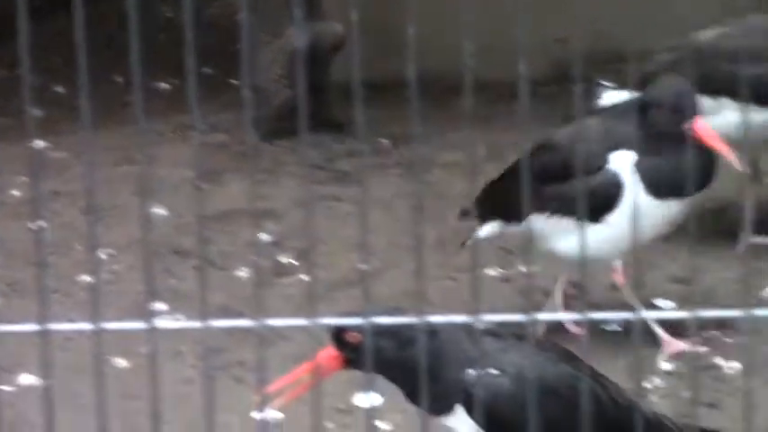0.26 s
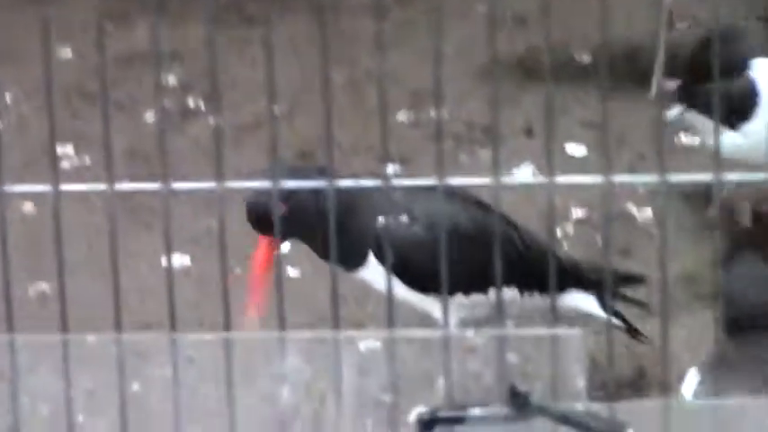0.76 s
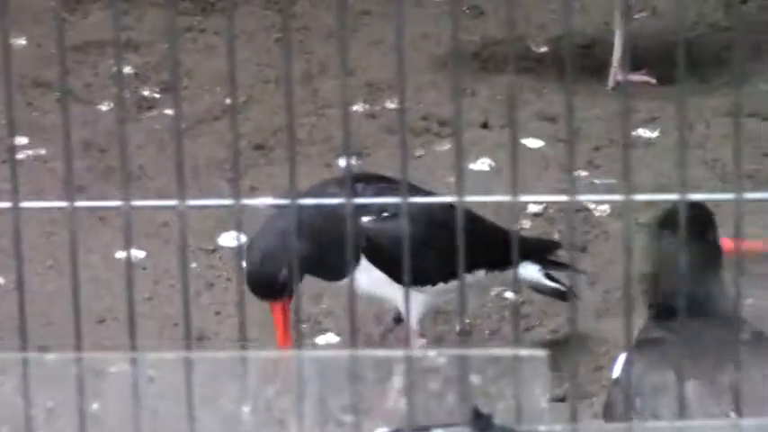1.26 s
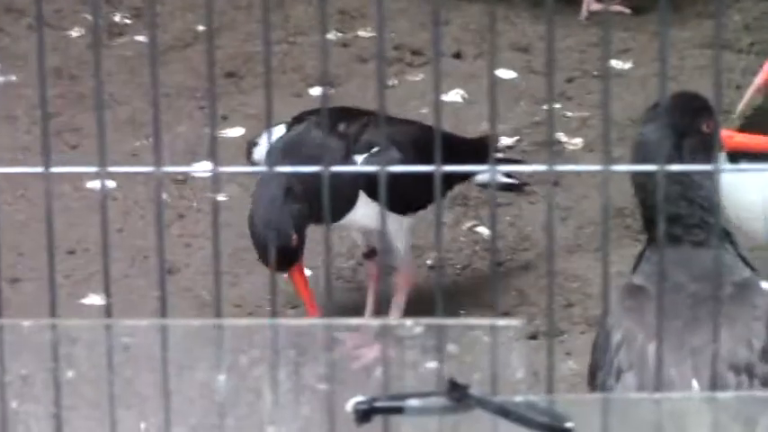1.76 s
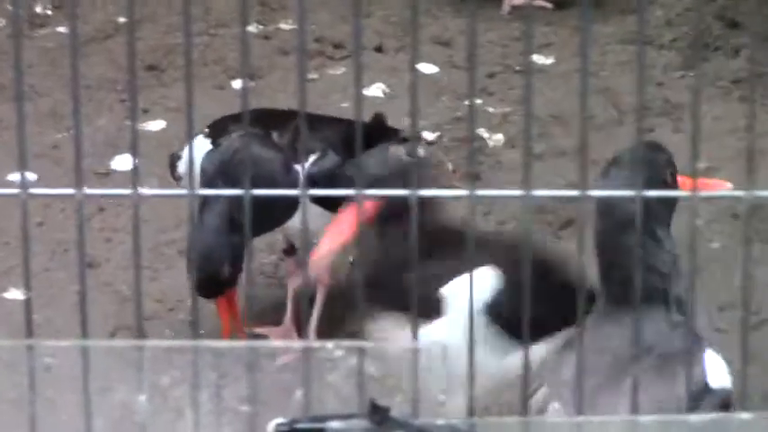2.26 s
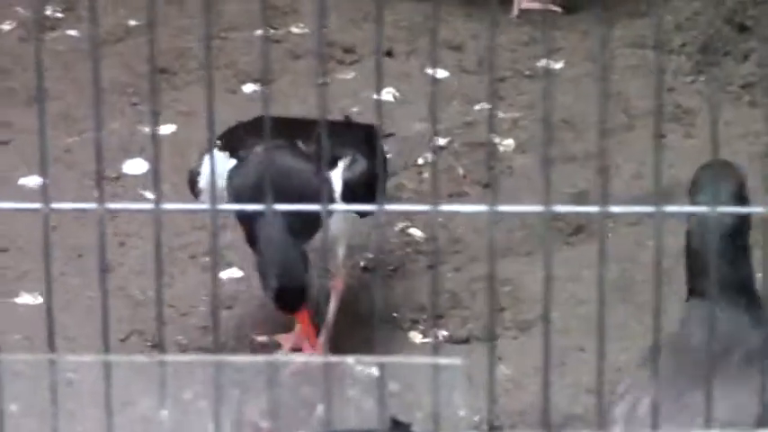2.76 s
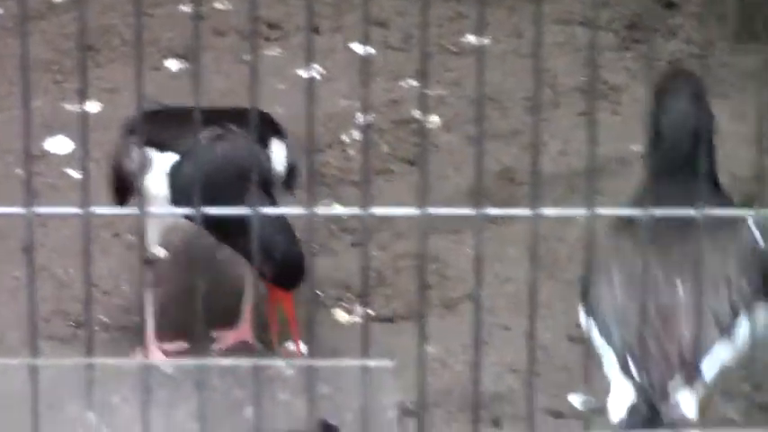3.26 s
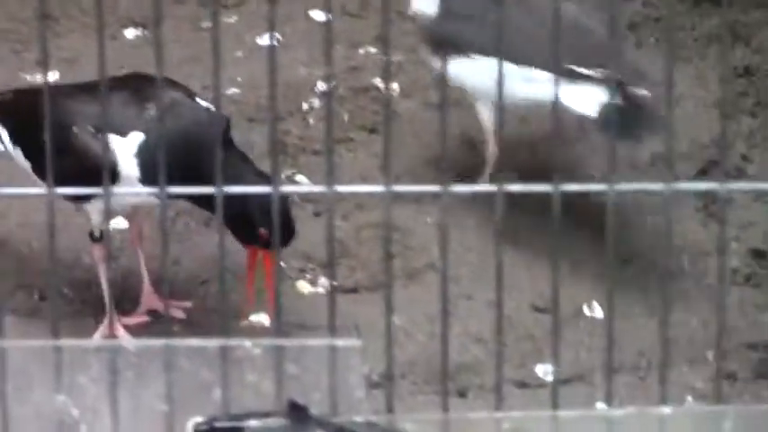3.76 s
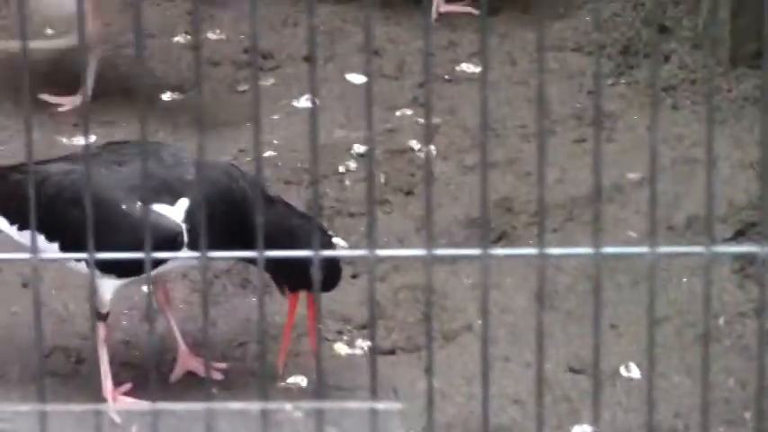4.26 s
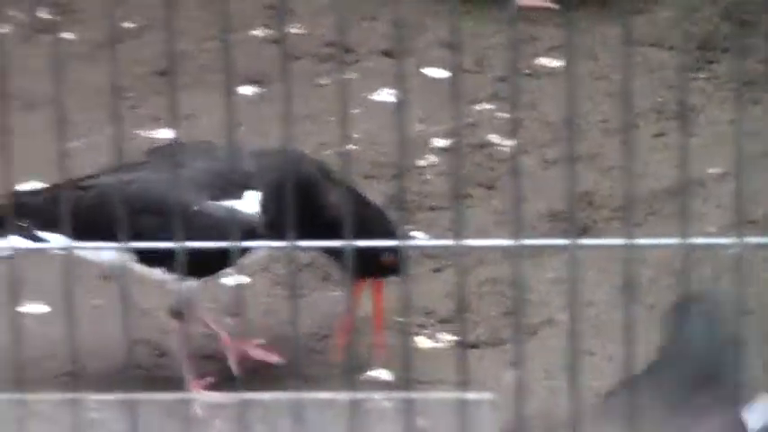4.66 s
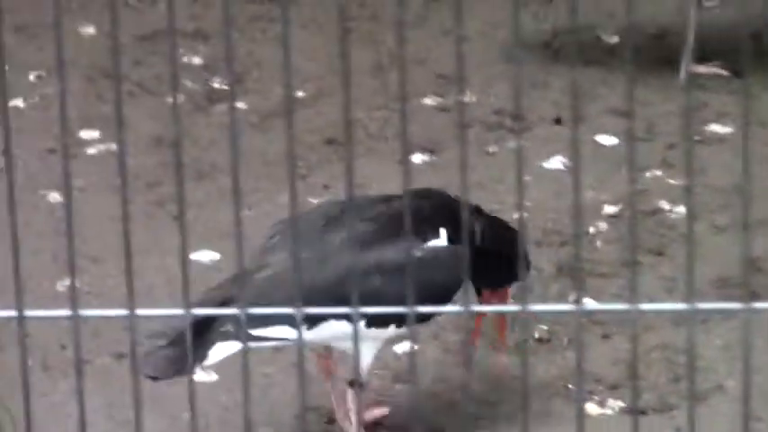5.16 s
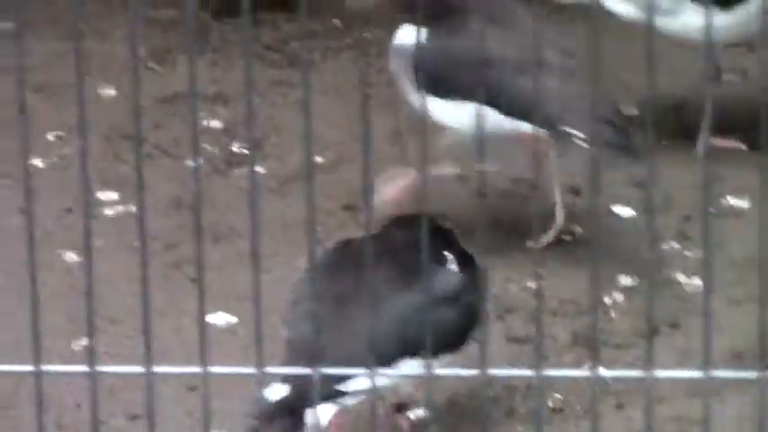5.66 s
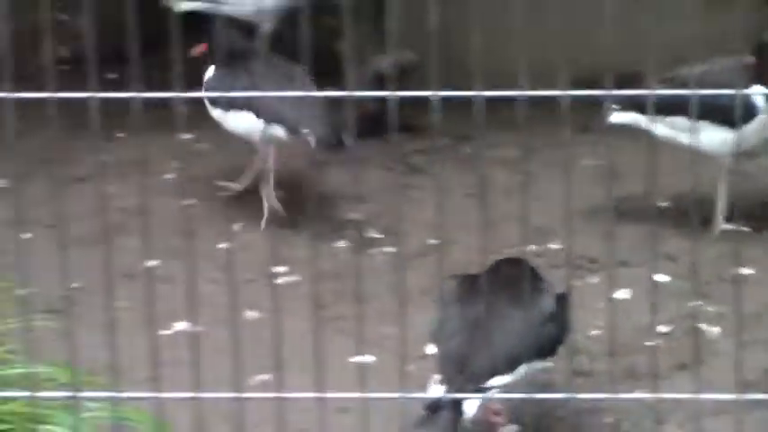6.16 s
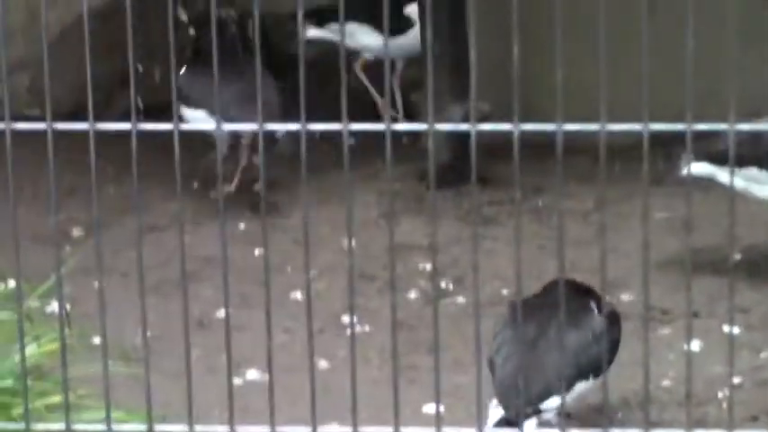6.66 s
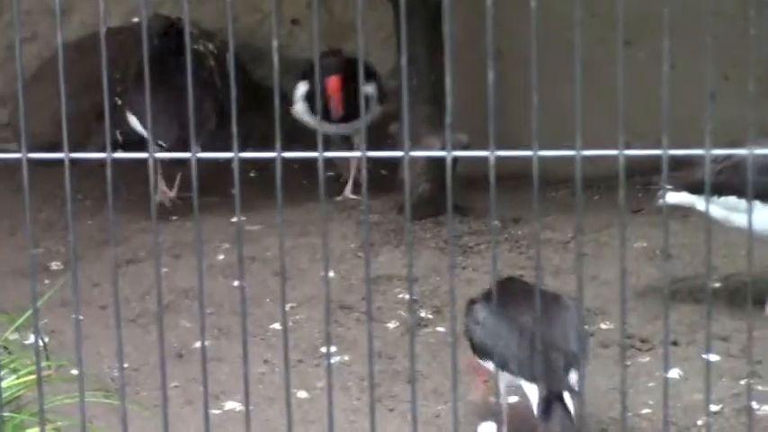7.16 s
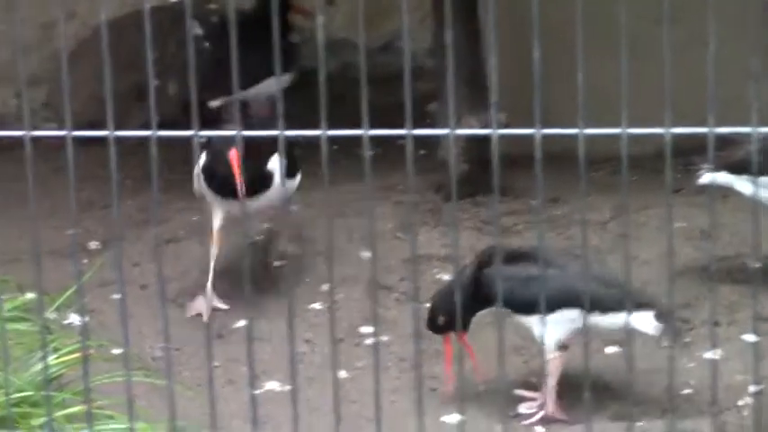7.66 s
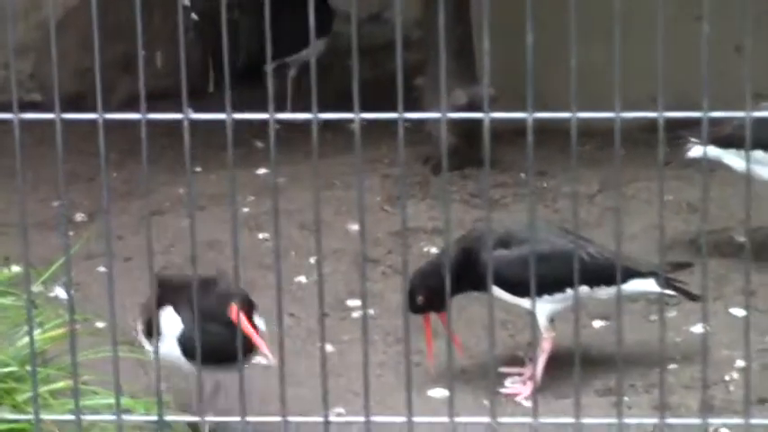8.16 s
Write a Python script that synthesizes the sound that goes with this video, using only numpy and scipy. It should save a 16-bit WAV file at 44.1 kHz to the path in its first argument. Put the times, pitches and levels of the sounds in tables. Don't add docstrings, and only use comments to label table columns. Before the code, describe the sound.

A close shore bird alternates short and rising notes, trills, then shrieks high piping while distant birds whistle over a low ventilation hum.

```python
import sys
import numpy as np
from scipy import signal
from scipy.io import wavfile
from scipy.ndimage import uniform_filter1d, minimum_filter1d

SR = 44100
rng = np.random.default_rng(int(sys.argv[2]) if len(sys.argv) > 2 else 0)


def gain_from_db(level_db):
    decades = np.asarray(level_db, float) / 20
    return 10 ** decades


def generate_wav(sig):
    pcm = np.round(np.clip(np.atleast_2d(sig).T, -1, 1) * 32767).astype(np.int16)
    wavfile.write(sys.argv[1], SR, pcm)


N = 370881


def at_hz(points, hz):
    table = np.array(points)
    return np.interp(np.log(hz), np.log(table[:, 0]), table[:, 1])


def rms_one(x):
    return x / np.sqrt(np.mean(x ** 2) + 1e-20)


def drift(rate_hz):
    r = np.exp(-2 * np.pi * rate_hz / SR)
    wander = signal.lfilter([1], [1, -2 * r, r * r], rng.standard_normal(N + 20000))
    return rms_one(wander[20000:])


def only_band(x, low_hz, high_hz):
    return signal.sosfilt(signal.butter(2, [low_hz, high_hz], "band", fs=SR, output="sos"), x)


# frequency_hz, level_db (per Hz)
AIR_COLOUR = [(18, -84), (28, -23), (60, -12), (165, -1), (400, -4.5), (955, -10.5), (1700, -18.5),
              (3000, -14.5), (5000, -21), (10000, -58), (15800, -87)]


def air():
    out, white, sway = 0, rng.standard_normal((2, 2, N)), drift(6.8)
    for k, low in enumerate(22 * 2. ** np.arange(0, 9.5, .5)):
        mid, side = only_band(white[k % 2], low, low * 2 ** .5)
        stereo = mid + .07 * side * [[1], [-1]]
        out = out + gain_from_db(at_hz(AIR_COLOUR, low * 2 ** .25)) * stereo
    return gain_from_db(-39 + 1.64 * sway) * rms_one(out)


def voice(notes, throat, tilt_db, scoop, scoop_s, fall, fall_s, attack_s, unsteady, warbles=True, flutter_db=2.0):
    warble_centre_hz, warble_width_hz, warble_rate_hz, warble_reach_hz = 3260, 125, 280, 240
    rasp_db = 1.0
    out, wobble, flutter = np.zeros(N), np.tile(drift(113), 2), drift(135)
    for start_s, length_s, first_hz, middle_hz, last_hz, level_db in notes:
        at = max(round(start_s * SR), 0)
        t = np.arange(at, min(round((start_s + length_s) * SR), N)) / SR - start_s
        end = at + len(t)
        u = t / length_s
        hz = first_hz * (1 - u) * (1 - 2 * u) + middle_hz * 4 * u * (1 - u) + last_hz * u * (2 * u - 1)
        ending = np.clip(1 - (length_s - t) / fall_s, 0, 1)
        unstable = np.exp(-((hz - warble_centre_hz) / warble_width_hz) ** 4) * (1 - ending)
        flips = np.sin(2 * np.pi * warble_rate_hz * t + 0.72 * flutter[at:end])
        hz = hz + warbles * warble_reach_hz * unstable * flips
        hz = hz * (1 - scoop * np.exp(-t / scoop_s)) * (1 - fall * ending ** 1.3)
        hz = hz * (1 + unsteady * wobble[at:end])
        phase = 2 * np.pi * np.cumsum(hz) / SR
        tone = 0
        for k in range(1, 13):
            loudness = gain_from_db(at_hz(throat, k * hz) + tilt_db * (k - 5))
            audible = k * hz < .45 * SR
            tone = tone + loudness * audible * np.sin(k * phase)
        breath = np.clip(t / attack_s, 0, 1) * np.clip((length_s - t) / .004, 0, 1)
        breath = breath * gain_from_db(flutter_db * flutter[at:end] + rasp_db * wobble[at + 300:end + 300])
        out[at:end] += gain_from_db(level_db - 11.8 * ending) * breath * tone
    return out


def arched(rows, first, last):
    return [(s, length, first * hz, hz, last * hz, db) for s, length, hz, db, *_ in rows]


# frequency_hz, level_db
LOW_THROAT = [(900, -4), (1300, -10), (1900, 0.5), (2600, 0), (3600, -1), (4300, -8.5), (4900, -19.5),
              (7500, -25), (10000, -29.5), (16000, -71)]
# start_s, length_s, pitch_hz, level_db
OPENING = [
    (-.12, .34, 1295, -36.5),
]


def opening_note():
    return voice(arched(OPENING, 0.95, 1.01), LOW_THROAT, -3.0, scoop=.03, scoop_s=.008, fall=.24,
                 fall_s=.016, attack_s=.055, unsteady=.003, flutter_db=4.0)


# frequency_hz, level_db
WHISTLE_THROAT = [(3000, 2), (3600, -5), (7000, -6.5), (10500, -40), (14000, -76)]
# start_s, length_s, pitch_hz, level_db
FAR_WHISTLES = [(-.02, 0.13, 4880, -44), (.352, 0.13, 4985, -35), (.715, 0.064, 3327, -34),
                (.94, 0.097, 3510, -29.5), (1.18, 0.11, 3516, -27.5), (1.45, 0.092, 3500, -27),
                (1.70, .12, 3500, -28.5), (1.94, 0.094, 3480, -31), (2.185, 0.124, 3490, -33.5),
                (2.50, 0.099, 3360, -37.5), (3.37, 0.039, 3330, -46)]


def far_whistles():
    return voice(arched(FAR_WHISTLES, .998, .995), WHISTLE_THROAT, 0.28, scoop=.03, scoop_s=.004, fall=.04,
                 fall_s=.01, attack_s=.006, unsteady=.0015, warbles=False)


# frequency_hz, level_db
TRILL_THROAT = [(2000, -14), (2600, 1.5), (4200, -14), (5100, -10.5), (6300, -27.5), (7500, -7),
                (8400, -24), (10000, -30), (13000, -39), (16000, -62)]
# start_s, length_s, pitch_hz, level_db
HIGH_TONES = [
    (0.12, 0.15, 2486, -54),
    (0.29, 0.0228, 2160, -11.5),
    (3.482, 0.017, 2360, -9),
]
# start_s, length_s, pitch_hz, level_db
TRILL_NOTES = [(3.669, 0.019, 2380, -38), (3.723, 0.0076, 2380, -12), (3.773, 0.0088, 2430, -11.5),
               (3.825, 0.0091, 2530, -9.5), (3.887, 0.021, 2400, -46), (3.933, 0.012, 2587, -7.5),
               (3.987, 0.015, 2446, -18.5), (4.036, 0.017, 2556, -9.5), (4.092, 0.02, 2560, -12.5),
               (4.151, 0.0165, 2570, -9), (4.207, .022, 2496, -10), (4.265, 0.025, 2673, -6),
               (4.332, 0.02, 2429, -10.5)]
# start_s, level_db
GRACES = [
    (5.781, -9.5),
    (6.158, -1),
    (6.858, -11),
]


def high_tones_trill_and_graces():
    graces = arched([(s, 0.025, 3003, db) for s, db in GRACES], 0.98, 1.185)
    return voice(arched(HIGH_TONES + TRILL_NOTES, 0.94, 0.9) + graces, TRILL_THROAT, 0.11, scoop=0.015,
                 scoop_s=0.0044, fall=0.073, fall_s=0.0082, attack_s=0.0023, unsteady=0.014)


# start_s, length_s, pitch_hz, level_db
SHORTS = [(.308, 0.056, 2145, -26), (.662, 0.041, 2030, -23), (.968, 0.037, 1976, -23),
          (1.278, 0.033, 2000, -21.5), (1.598, 0.035, 1988, -23), (1.915, 0.035, 1894, -21),
          (2.252, 0.037, 1614, -24), (2.543, 0.036, 1754, -24), (2.83, .03, 1766, -21.5),
          (3.10, 0.032, 1790, -20.5), (3.353, 0.036, 1943, -21), (3.597, .038, 1603, -24)]


def short_low_notes():
    return voice(arched(SHORTS, 0.67, 1.3), LOW_THROAT, 0.7, scoop=.22, scoop_s=.004, fall=.4,
                 fall_s=.013, attack_s=.004, unsteady=.024, flutter_db=3.0)


# start_s, length_s, last_pitch_hz, level_db
RISES = [(0.407, 0.18, 1274, -33.5), (0.761, 0.13, 1279, -31), (1.063, 0.12, 1287, -28.5),
         (1.378, 0.12, 1329, -28.5), (1.699, 0.14, 1312, -31), (2.008, 0.16, 1435, -26.5),
         (2.34, .10, 1485, -23.5), (2.63, .10, 1537, -23), (2.917, 0.09, 1720, -20.5),
         (3.187, .065, 1872, -17), (3.446, 0.045, 2328, -15)]


def long_rising_notes():
    start_hz, start_follows, halfway = 1120, 0.1236, 0.46
    notes = []
    for s, length, last_hz, db in RISES:
        first_hz = start_hz + start_follows * max(last_hz - start_hz - 200, 0)
        middle_hz = first_hz + halfway * (last_hz - first_hz)
        notes.append((s, length, first_hz, middle_hz, last_hz, db))
    return voice(notes, LOW_THROAT, 0.18, scoop=.03, scoop_s=.008, fall=.24,
                 fall_s=.016, attack_s=.055, unsteady=.003, flutter_db=4.0)


# start_s, peak_level_db, tone_hz
TAPS = [
    (.878, -24, 700),
    (.89, -27, 400),
    (3.19, -24, 500),
    (3.105, -33, 440),
    (5.5, -23, 700),
    (5.615, -23, 1200),
    (5.667, -5, 1300),
    (5.717, -22, 1000),
    (7.8, -21, 400),
    (7.42, -25, 1200),
]


def taps():
    out, t = np.zeros(N), np.arange(900) / SR
    for (start_s, peak_db, hz), noise in zip(TAPS, rng.standard_normal((len(TAPS), 900))):
        burst = only_band(noise * np.exp(-t * hz / 3), hz / 2.5, hz * 2.5)
        at = round(start_s * SR)
        out[at:at + 900] += gain_from_db(peak_db) * burst / np.abs(burst).max()
    return out


# frequency_hz, level_db
FAR_THROAT = [(900, -75), (1200, 9), (2100, 10), (3300, 2.5), (4300, 1), (5400, -1), (7500, -13),
              (9000, -8.5), (14000, -39)]
# start_s, length_s, pitch_hz, level_db
FAR_ARCHES = [(1.875, 0.039, 925, -49), (2.19, 0.042, 1066, -40), (2.475, 0.066, 1082, -40),
              (2.763, 0.042, 1084, -40), (3.04, 0.0377, 1120, -38), (3.29, 0.11, 1120, -40.5),
              (4.54, 0.06, 1060, -51), (4.83, 0.011, 1110, -29), (5.18, 0.02, 1090, -30.5),
              (5.535, 0.035, 1088, -41.5), (5.905, 0.032, 1094, -40.5), (6.26, 0.033, 1070, -35.5),
              (6.615, 0.017, 1050, -32), (6.955, 0.027, 1020, -43), (7.275, 0.061, 955, -56),
              (7.55, 0.03, 1056, -40)]
# start_s, length_s, pitch_hz, level_db
FAR_SINKS = [
    (7.755, 0.068, 1080, -38.5),
    (8.0, 0.062, 1083, -38.5),
    (8.235, 0.074, 1082, -37.5),
]


def far_arches():
    notes = arched(FAR_ARCHES, 0.86, 0.86) + arched(FAR_SINKS, 0.94, .85)
    return voice(notes, FAR_THROAT, 0.39, scoop=.02, scoop_s=.006, fall=.05,
                 fall_s=.015, attack_s=.008, unsteady=.002)


def catches():
    lead_s, upper_lead_s = 0.011, 0.04
    times = [(n[0] - lead_s, -34.5) for n in TRILL_NOTES]
    times += [(n[0] - lead_s, n[4]) for n in LOWER]
    times += [(n[0] - lead_s, -36.5) for n in HELD]
    times += [(n[0] - upper_lead_s, -40) for n in UPPER[1:4] + DIPPED[2:]]
    notes = [(s, .013, 1400, 1700, 1950, db) for s, db in times]
    return voice(notes, LOW_THROAT, -2.5, scoop=0.15, scoop_s=0.001, fall=.01,
                 fall_s=0.0013, attack_s=0.001, unsteady=0.013)


# frequency_hz, level_db
HIGH_THROAT = [(1500, -10), (2250, -7), (2650, 9), (2900, 4), (3600, 1.5), (4400, -11.5), (5300, 5.5),
               (6150, -12.5), (7100, -1), (8000, 0.5), (9200, -27), (10700, -13.5), (13000, -38),
               (16000, -21)]
# start_s, length_s, pitch_hz, level_db
SWELL = [
    (4.443, .066, 3040, -13),
]


def swelling_pipe():
    return voice(arched(SWELL, .998, .995), HIGH_THROAT, -0.36, scoop=.03, scoop_s=.004, fall=.25,
                 fall_s=.018, attack_s=.025, unsteady=.0015)


# start_s, length_s, pitch_hz, level_db, catch_level_db
LOWER = [
    (4.634, 0.043, 2715, -21, -45),
    (4.946, 0.042, 2880, -16.5, -38),
    (5.306, .042, 2940, -18, -35),
    (5.662, 0.053, 3011, -17.5, -34),
    (6.036, 0.036, 3110, -14, -44.5),
    (6.383, 0.042, 3000, -15.5, -34.5),
    (6.74, 0.043, 3030, -14.5, -37.5),
    (7.075, 0.033, 3192, -14, -43),
]


def lower_piping():
    return voice(arched(LOWER, 0.96, 0.89), HIGH_THROAT, -1.72, scoop=0.1694, scoop_s=0.00445, fall=.3,
                 fall_s=0.027, attack_s=0.0039, unsteady=.0015)


# start_s, length_s, pitch_hz, level_db, slide (share of pitch)
UPPER = [
    (4.749, 0.063, 3544, -7.5, 0.017),
    (5.788, .108, 3558, -9, -.035),
    (6.164, .089, 3553, -8.5, -0.044),
    (6.865, 0.075, 3533, -8, 0.023),
    (7.197, .048, 3534, -8, 0.016),
    (7.372, 0.04, 3190, -11, -0.088),
    (7.489, 0.031, 3506, -9.5, -0.059),
]
# start_s, length_s, pitch_hz, level_db
DIPPED = [
    (5.059, 0.11, 3040, -13.5),
    (5.428, 0.098, 3027, -13.5),
    (6.51, .091, 3088, -10.5),
]


def upper_piping():
    edge = 0.99
    notes = [(s, length, hz * (edge - slide / 2), hz, hz * (edge + slide / 2), db)
             for s, length, hz, db, slide in UPPER]
    return voice(notes + arched(DIPPED, 1.095, 1.135), HIGH_THROAT, -0.62, scoop=.16, scoop_s=.0022, fall=.34,
                 fall_s=.019, attack_s=.003, unsteady=.001)


# start_s, length_s, pitch_hz, level_db
HELD = [
    (7.617, 0.12, 3093, -7.5),
    (7.845, 0.12, 2898, -12),
    (8.082, .14, 2834, -14.5),
    (8.321, 0.18, 2792, -14),
]


def held_piping():
    return voice(arched(HELD, 1.05, 0.94), HIGH_THROAT, -0.45, scoop=.15, scoop_s=.006, fall=.17,
                 fall_s=.018, attack_s=.004, unsteady=.0015)


def near_bird():
    low = opening_note() + short_low_notes() + long_rising_notes() + catches()
    piping = swelling_pipe() + lower_piping() + upper_piping() + held_piping()
    return low + high_tones_trill_and_graces() + piping


# frequency_hz, time_s
ROOM_T60 = [(1000, 0.38), (3000, 0.34), (6000, 0.39), (12000, 0.26)]
# delay_s, level_db
ECHOES = [
    (.0035, -5.5),
    (.0069, -4),
    (0.0158, -12),
    (0.0172, -14),
]


def aviary(x):
    t, tail = np.arange(SR) / SR, 0
    for low in 700 * 2. ** np.arange(0, 4.5, .5):
        mid, side = only_band(rng.standard_normal((2, SR)), low, low * 2 ** .5)
        decay = gain_from_db(-60 * t / at_hz(ROOM_T60, low * 2 ** 0.79))
        tail = tail + (mid + 0.14 * side * [[1], [-1]]) * decay
    far_wall_s, spread_s, far_wall_db = 0.016, 0.072, 1.5
    tail = tail * gain_from_db(far_wall_db * np.exp(-.5 * ((t - far_wall_s) / spread_s) ** 2))
    tail = gain_from_db(1.5) * tail * np.clip(t / 0.03, 0, 1) / np.sqrt(np.sum(tail[0] ** 2))
    for delay_s, db in ECHOES:
        tail[:, round(delay_s * SR)] += gain_from_db(db) * (1 + 0.15 * rng.standard_normal(2))
    return signal.fftconvolve(x[None], tail, axes=1)[:, :N]


def scene():
    near, far, knocks = gain_from_db(-1.5) * near_bird(), far_whistles() + far_arches(), taps()
    direct = gain_from_db(1.0) * near + .55 * far + knocks
    room = aviary(near + far + 0.3 * knocks)
    balance = gain_from_db([[.15], [-.15]])
    return (direct + room + air()) * balance


def low_pass(x):
    return signal.sosfilt(signal.butter(12, 15940, fs=SR, output="sos"), x)


def record(dry):
    power = signal.lfilter([.004], [1, -.996], np.mean(dry ** 2, axis=0))
    over_db = np.maximum(10 * np.log10(power + 1e-12) + 16, 0)
    release_db = 150 * np.arange(N) / SR
    duck_db = np.maximum.accumulate(over_db + release_db) - release_db
    x = dry * gain_from_db(1.5 - 0.38 * duck_db)
    x = signal.sosfilt(signal.butter(2, 30, "high", fs=SR, output="sos"), x)
    ceiling, look_samples = .9, 65
    room_left = np.minimum(ceiling / (np.abs(x).max(axis=0) + 1e-9), 1)
    lowest_gain = minimum_filter1d(room_left, size=look_samples)
    x = x * uniform_filter1d(lowest_gain, size=look_samples)
    mix = signal.sosfilt(signal.cheby2(10, 50, 15990, fs=SR, output="sos"), x)
    return low_pass(mix)


dry = scene()
out = record(dry)
generate_wav(out)
```